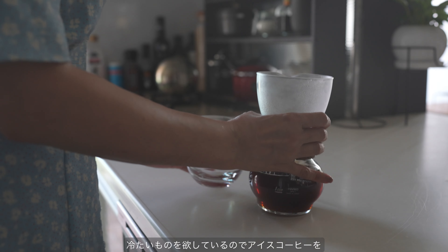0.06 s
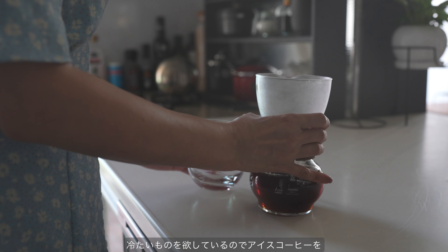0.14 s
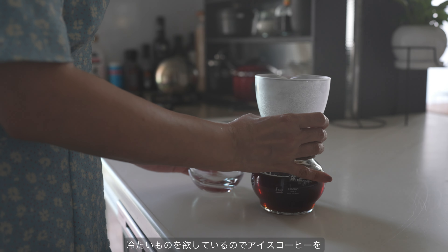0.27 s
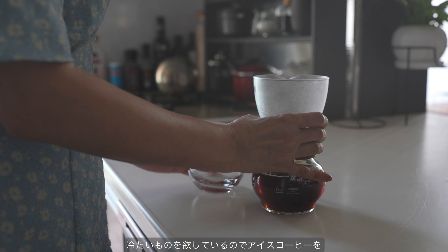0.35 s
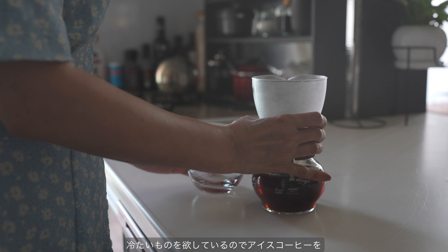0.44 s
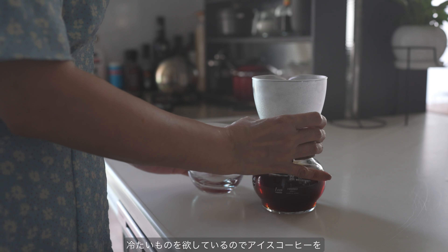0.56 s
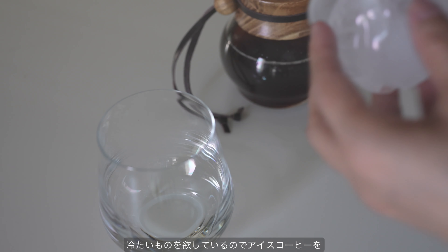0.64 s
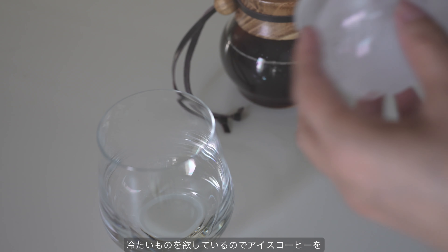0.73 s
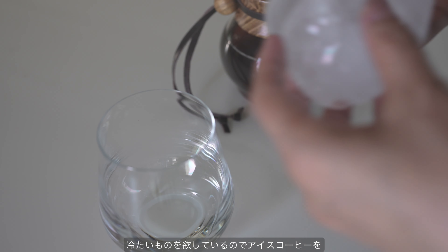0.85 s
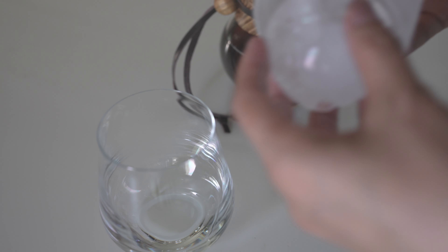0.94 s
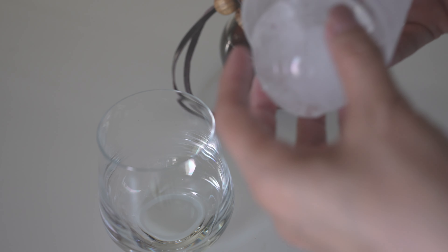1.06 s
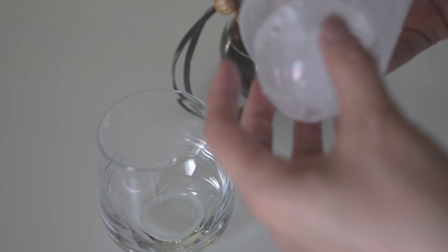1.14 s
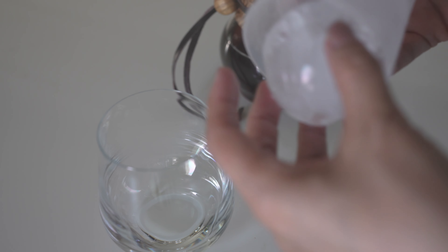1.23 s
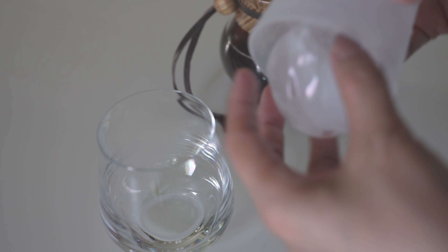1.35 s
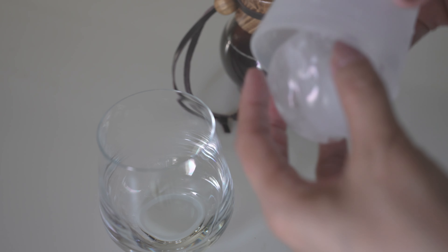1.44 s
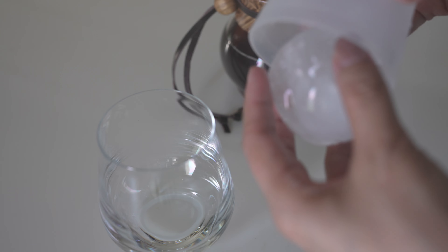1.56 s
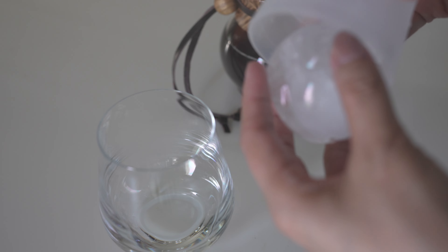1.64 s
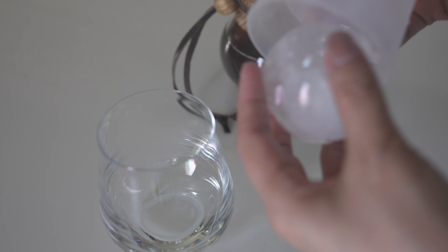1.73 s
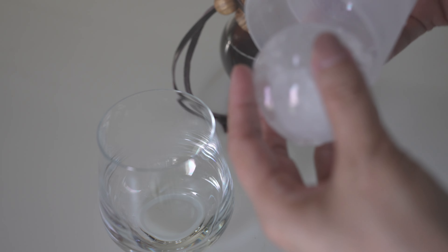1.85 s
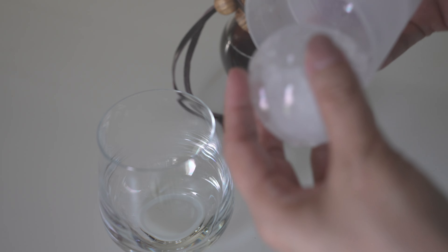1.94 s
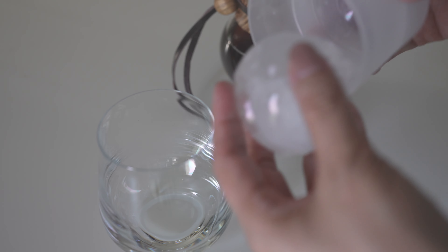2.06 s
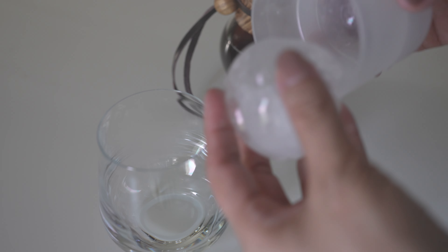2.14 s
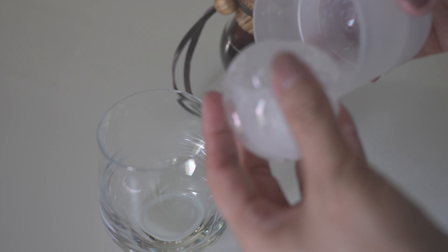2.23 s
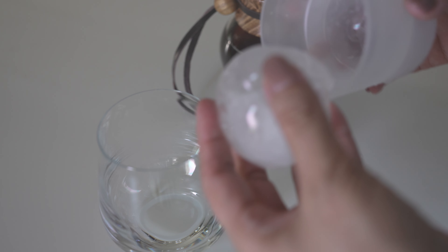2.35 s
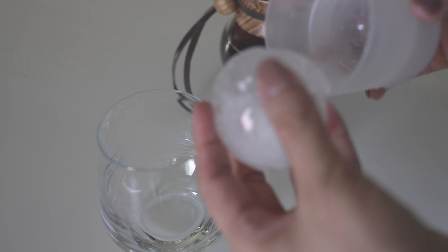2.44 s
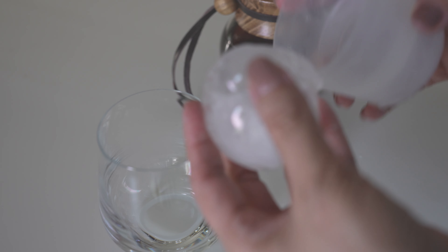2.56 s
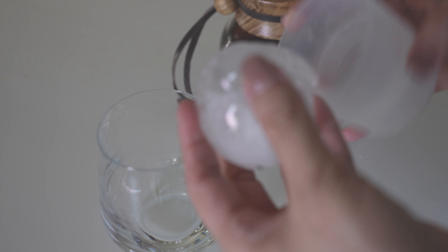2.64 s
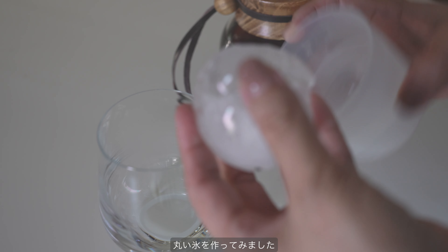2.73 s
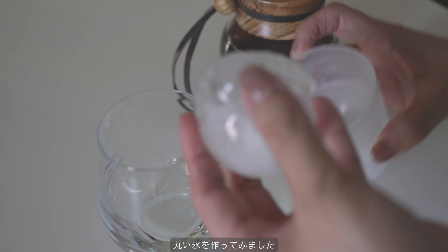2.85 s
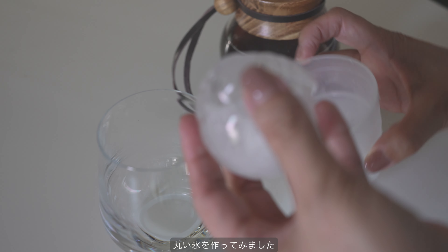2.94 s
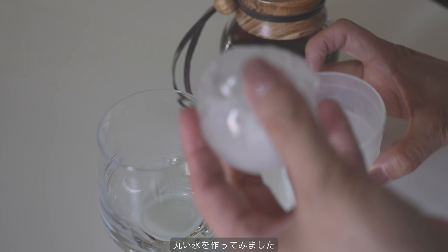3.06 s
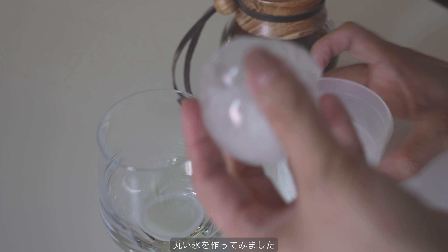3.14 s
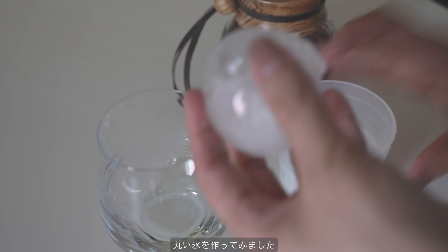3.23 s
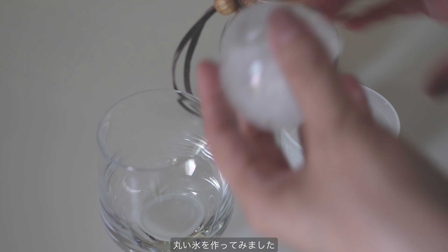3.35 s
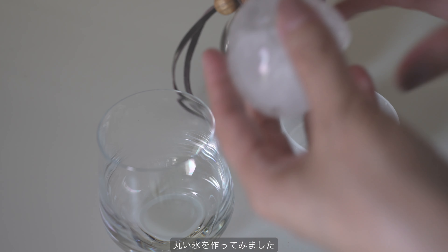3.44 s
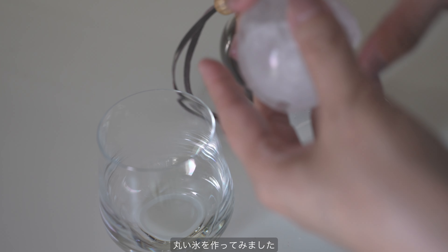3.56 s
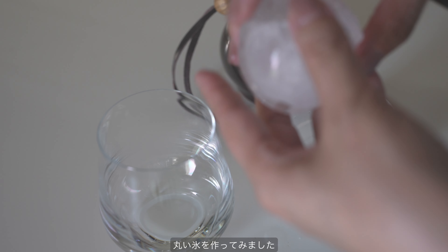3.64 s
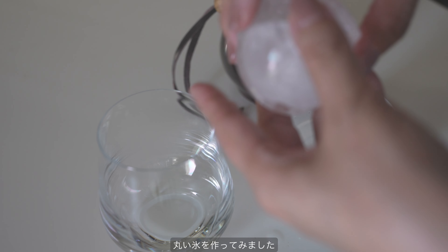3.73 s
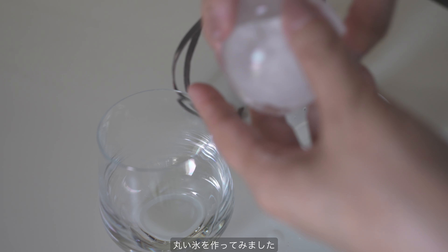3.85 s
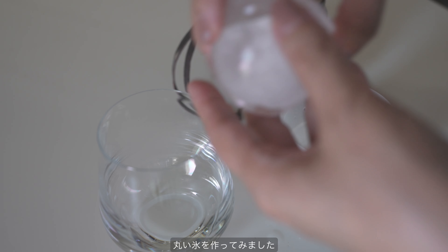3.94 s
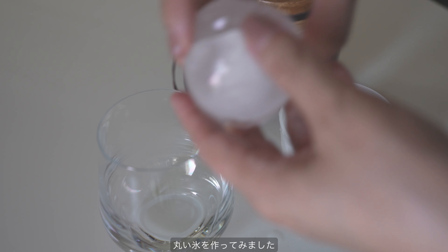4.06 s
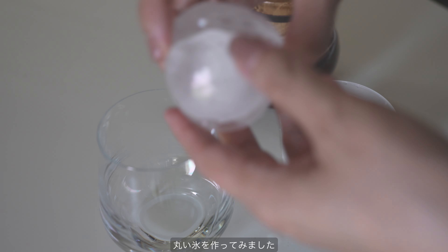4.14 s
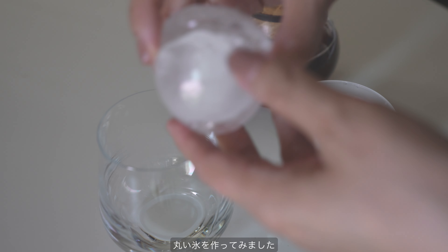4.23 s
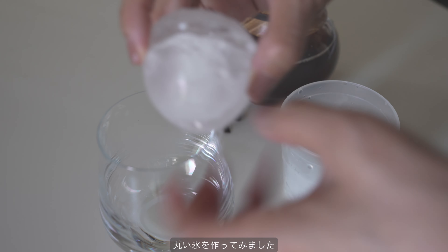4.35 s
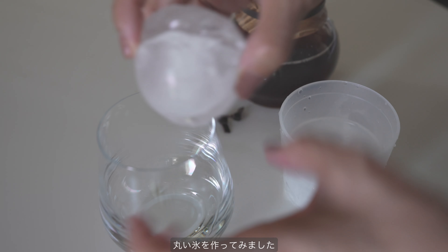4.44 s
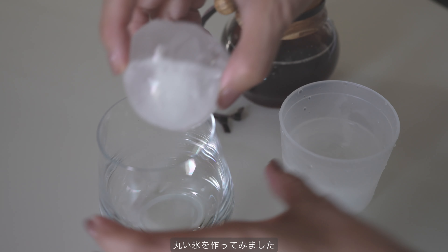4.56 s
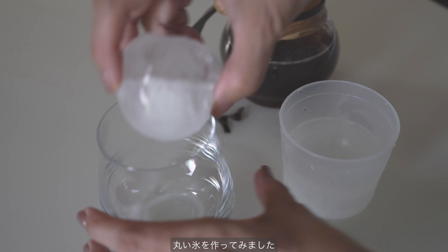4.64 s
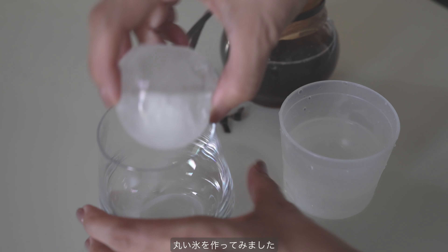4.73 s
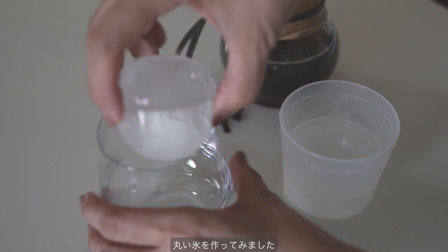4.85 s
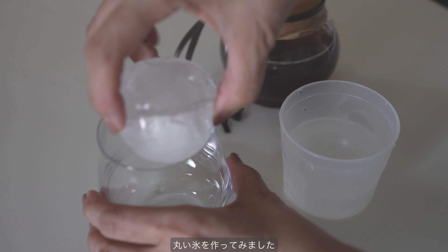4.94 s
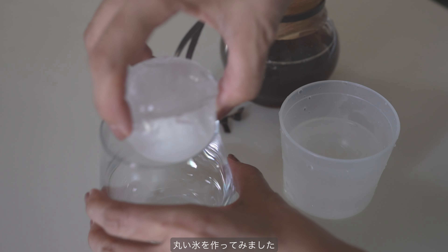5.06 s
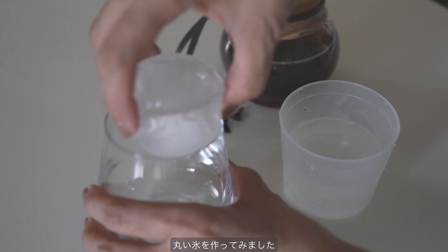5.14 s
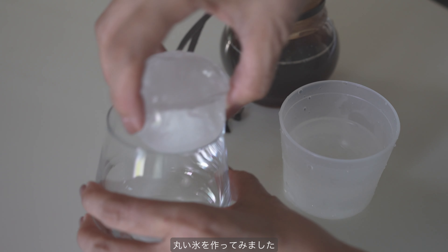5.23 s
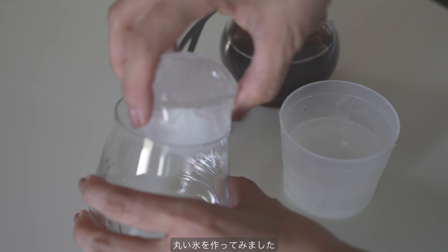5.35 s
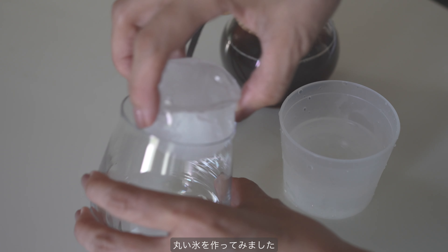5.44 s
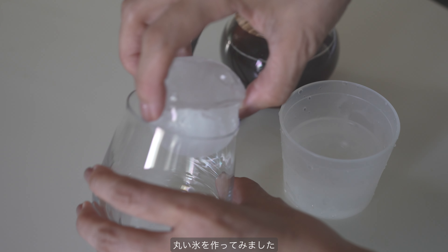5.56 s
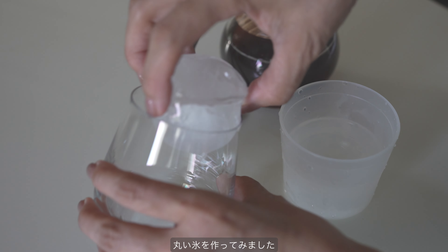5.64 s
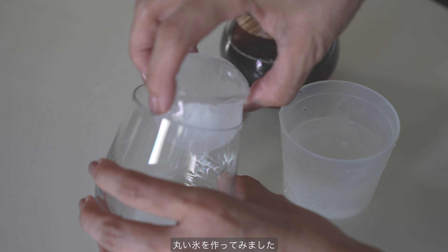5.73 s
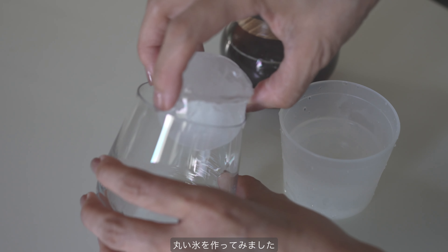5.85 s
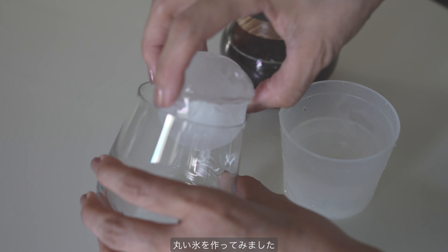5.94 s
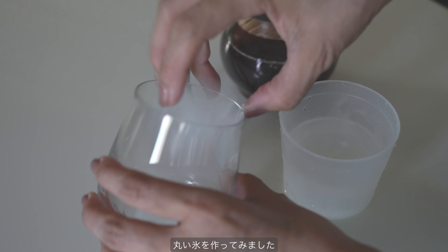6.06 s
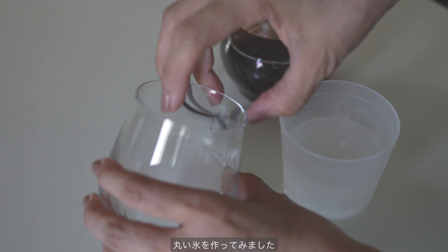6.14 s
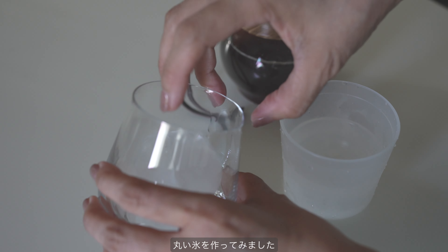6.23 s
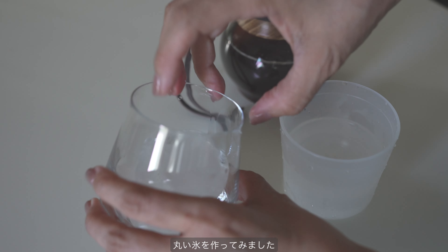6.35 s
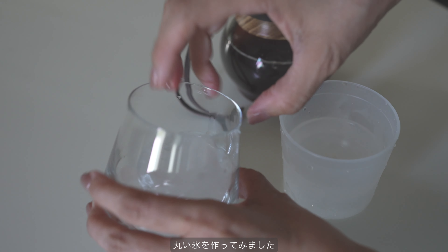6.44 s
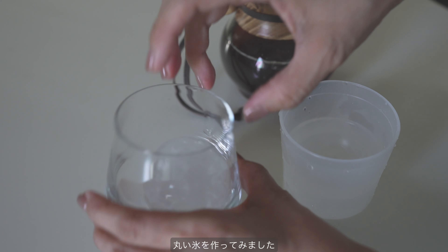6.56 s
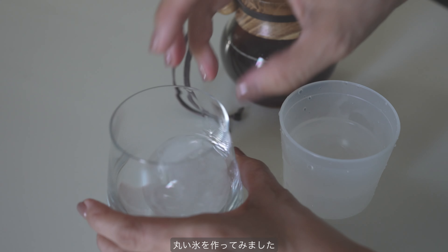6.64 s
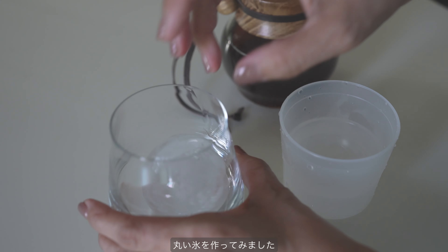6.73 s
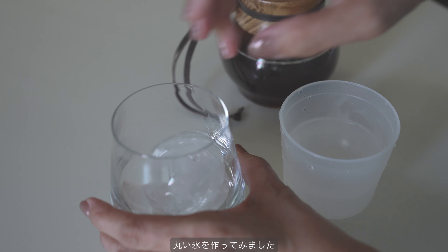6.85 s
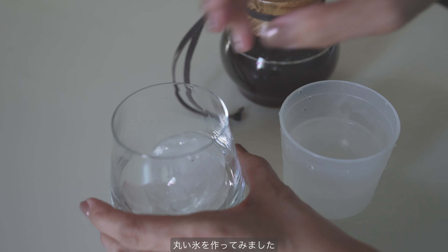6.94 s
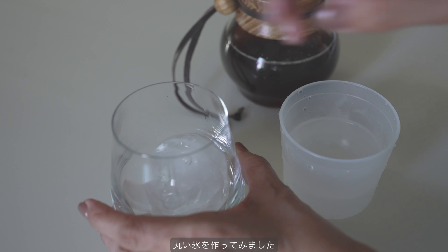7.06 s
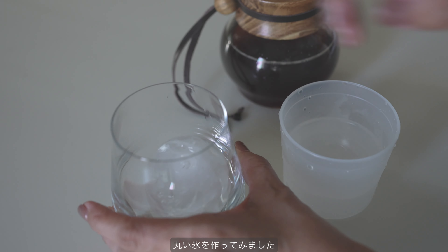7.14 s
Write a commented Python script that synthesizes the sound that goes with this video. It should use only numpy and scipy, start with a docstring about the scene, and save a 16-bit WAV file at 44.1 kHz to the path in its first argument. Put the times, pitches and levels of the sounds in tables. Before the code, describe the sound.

A coffee dripper knocks on a counter, an empty plastic mold rattles down, then an ice ball clinks and slides into a singing glass tumbler.

```python
"""A kitchen counter, where a coffee dripper knocks, a wet ball of ice slides out of its plastic mold and the
dropped mold rattles to rest. The ball taps a hand-held tumbler, rolls down its wall and makes it sing; the
tilted tumbler then knocks back onto its foot. Blows are coloured noise bursts with dying modes, rolling and
slipping are filtered random grains, sung notes are wavering sines; soft room tone lies beneath it all."""
import sys
import numpy as np
from scipy import signal
from scipy.fft import rfft, irfft
from scipy.io import wavfile
from scipy.ndimage import uniform_filter1d

SR = 44100
rng = np.random.default_rng(int(sys.argv[2]) if len(sys.argv) > 2 else 0)


def materialize(psi):
    """Save the field psi as 16-bit PCM at rate SR to the path in sys.argv[1].

    A 1-D psi becomes a single channel; in a 2-D psi each row is a channel.
    """
    bounded = np.clip(np.atleast_2d(psi).T, -1, 1)
    quanta = np.round(bounded * 32767).astype(np.int16)
    wavfile.write(sys.argv[1], SR, quanta)


N = 317079  # length in samples

# Levels in the tables are relative: trims, damping and room come on top.
# Ice against the tumbler's wall. Each row: start in seconds, knock in dB, ring in dB,
# hardness in dB per octave, bass weight in dB.
WALL_BLOWS = [(4.744, -38, -47.5, 0, 8.5), (4.898, -32, -31.5, -0.5, 0.5), (4.925, -43, -51, 1, 12),
              (5.248, -46.5, -48.5, 2.5, 0), (5.428, -34, -48.5, 0, 5.5), (6.0181, -36.5, -47.5, 5, 10),
              (6.0462, -25.5, -41.5, 3, -2), (6.075, -33.5, -41, -2, -4), (6.107, -35, -36, 2, -5.5),
              (6.116, -25, -40.5, 3.5, -5.5), (6.127, -25, -50.5, 0.5, -21), (6.2164, -49, -29.5, 2.5, 1),
              (6.392, -47, -46, -6, 1), (6.418, -39.5, -40.5, 1, 0)]
# Colour of the wall's knock. Each row: frequency in Hz, density in dB per Hz.
WALL_KNOCK = [(80, -7), (250, -2), (400, 4), (620, 5), (850, -9), (1350, -11.5), (1600, -14.5), (1820, -20),
              (2100, -15), (2900, -17), (4600, -29.5), (6600, -35.5), (8500, -22.5), (11500, -35),
              (16000, -23.5)]
# Modes of the free wall. Each row: frequency in Hz, level in dB, t60 in seconds.
WALL_MODES = [(1634, 3, 0.18), (2320, -6, .4), (2695, -5, 0.064), (3526, -11, 0.28), (5286, -10.5, 0.97),
              (5800, -36, 0.146), (7390, -6.5, 0.75), (7910, -7, 1), (8740, -2.5, 0.84),
              (8820, -12.5, 0.078), (9530, -16, 0.26), (10250, -10, 0.32), (11000, -8.5, 0.054),
              (11500, -33, 0.21), (12000, -21.5, 0.081), (13100, -7.5, 0.14), (13300, -27, 0.17),
              (13980, -22, .2), (14500, -14, .15), (15100, -40, .15), (15650, -18.5, .2)]
# how firmly the fingers press the ball on the glass (0-1), before and after they let it go
PRESS_HELD, PRESS_FREE, LET_GO_AT_S, LET_GO_LENGTH_S = .86, 0.072, 6.0, 0.033
RIM_DB = 3  # held against the rim, the ball feeds the lowest mode most
# the falling ball skips down the wall; each skip: knock dB, ring dB, hardness dB per octave, bass dB
SKIP_AT_S, SKIP_GAP_S, SKIP = 6.153, 0.026, (-35, -54, -2, -6)


def wall_taps():
    """Ice strikes the tumbler; while it stays pressed on, the glass rings higher and shorter."""
    out = np.zeros((2, N))
    skips = [(SKIP_AT_S + k * SKIP_GAP_S, *SKIP) for k in range(3)]
    for s, knock_db, ring_db, hardness, bass_db in WALL_BLOWS + skips:
        since_let_go = s - LET_GO_AT_S
        pressed = np.interp(since_let_go, [0, LET_GO_LENGTH_S], [PRESS_HELD, PRESS_FREE])
        lowest_hz = WALL_MODES[0][0]
        modes = [(hz, db + RIM_DB * pressed * (hz == lowest_hz), t60) for hz, db, t60 in WALL_MODES]
        glass = ring(modes, scatter_db=2.5, damping=350 + 1200 * pressed, stiffen_hz=195 * pressed)
        hit = amp(knock_db) * knock(WALL_KNOCK, hardness, bass_db, shudder=0.96, t60=0.078)
        add(out, s, kitchen(hit + amp(ring_db - 4.5) * glass, wet_db=-2.5))
    return out


# The ball scraping the wall. Each row: start in seconds, length in seconds, level in dB.
BALL_GRINDS = [(6.11, .18, -38.5)]
SCRAPE_WIDTH_HZ = 23  # the scraping ball damps the modes and widens them


def grinding(slips):
    """Tiny slips of the scraping ball shake the widened modes of the wall, with a little wet hiss."""
    glass = 0.
    for hz, db, t60 in WALL_MODES:
        level = amp(db + 0.98 * np.log2(hz / 8000))
        glass = glass + level * resonate(slips, hz, 6 / t60 + SCRAPE_WIDTH_HZ)
    hiss = evened(colour(slips, SLIDE_HISS))
    return (evened(glass) + 0.09 * hiss) * strokes(BALL_GRINDS, rise=0.079, t60=0.17)


# Notes rubbed out of the glass. Each row: start in seconds, length in seconds, level in dB,
# rise in seconds, t60 in seconds.
NOTES = [(6.095, 0.11, -40, 0.065, 0.93), (6.204, 0.097, -32, .055, 0.087), (6.6, .23, -57.5, .15, 0.96)]
# Modes that the rubbing draws. Each row: frequency in Hz, level in dB, lag of the swell in seconds.
SUNG_MODES = [(1625, -0.5, 0.0014), (2300, -13.5, 0.0087), (3525, -17.5, 0.031), (5250, -25.5, 0.032)]


def singing():
    """Stick-slip draws the low modes as wavering notes; the higher ones swell late and ring on."""
    t = np.arange(N) / SR
    drive = sum(stroke(*row) for row in NOTES)
    note = 0.
    for hz, db, lag in SUNG_MODES:
        # halved, because the resonance at 0 Hz has gain 2
        swell = resonate(drive, 0, 1 / (2 * np.pi * lag)) / 2 * amp(1.2 * waver(25))
        # the higher modes reach the ears further out of step
        apart = min(hz / 3600, .8) * np.array([[1], [-1]])
        note = note + amp(db) * swell * np.sin(2 * np.pi * hz * t + 0.41 * waver(31) + apart)
    return np.sqrt(2) * note


# Squeaks of the rubbed glass. Each row: start in seconds, length in seconds, level in dB.
SQUEAKS = [(6.248, 0.019, -34.5), (6.276, 0.0069, -38.5)]
SQUEAK_HZ = 8005


def squeaking():
    """Stick-slip at one high pitch: brief sines with a fast, random waver of phase."""
    t = np.arange(N) / SR
    tone = np.sin(2 * np.pi * SQUEAK_HZ * t + 1.5 * waver(160))
    return strokes(SQUEAKS, rise=0.0026, t60=.04) * tone


def rubbing():
    """The ball slips down the wall: it grinds, sings and squeaks, each with its own share of room."""
    slips = widened(grains(per_s=2800, spread_db=7.0), 0.62 * grains(per_s=1300, spread_db=10.5))
    wet_grind = kitchen(grinding(slips), wet_db=-8.0)
    return wet_grind + kitchen(singing(), wet_db=-13) + kitchen(squeaking(), wet_db=-7.5)


# Stereo lean of the wall's sound. Each row: frequency in Hz, left minus right in dB.
GLASS_BALANCE = [(400, 1), (1600, 4), (2400, -1), (4400, 1.5), (8500, -5.5), (12000, 1.5)]


def tumbler_wall():
    """Taps and rubbing together; each mode of the wall radiates more to one side."""
    lean_db = read(GLASS_BALANCE, np.fft.rfftfreq(N, 1 / SR)) * np.array([[.5], [-.5]])
    return irfft(rfft(wall_taps() + rubbing()) * amp(lean_db), N)


# The foot knocking on the counter. Each row: start in seconds, knock in dB, ring in dB,
# hardness in dB per octave, bass weight in dB.
FOOT_BLOWS = [(6.5465, -23.5, -45, 2, 7), (6.556, -30.5, -49.5, -7, 8), (6.636, -54, -50, 5, -11),
              (6.6625, -26.5, -47, 2.5, -46), (6.731, -35.5, -51.5, 1, -31), (6.765, -53, -76, 14, 0),
              (6.892, -31, -75.5, 1, 14)]
# Colour of the foot's knock. Each row: frequency in Hz, density in dB per Hz.
FOOT_KNOCK = [(59, -48), (100, -22.5), (299, -12), (481, 0.5), (841, -7), (1010, 0), (1200, -3.5),
              (1880, -9), (2850, -10.5), (3810, -19.5), (4580, -32), (10300, -53.5), (13200, -41),
              (14000, -52)]
# Modes of the foot. Each row: frequency in Hz, level in dB, t60 in seconds.
FOOT_MODES = [(968, 6.5, 0.3), (994, 8.5, 0.42), (1040, -3, 0.22), (1420, 12.5, .1), (2100, -11, .15),
              (2760, 11.5, 0.08), (3630, -14, .08), (8000, -19, .15), (9100, -22, 0.23), (10975, -22, 0.3),
              (12040, -4, 0.15), (12960, 3, 0.093), (15710, -20, 0.38)]


def tumbler_foot():
    """The tilted tumbler knocks back onto its foot: glass modes and a thud of the worktop."""
    return blows(FOOT_BLOWS, FOOT_KNOCK, FOOT_MODES, knock_db=0.0, ring_db=-5, thud_db=-31.5,
                 shudder=0.78, t60=0.051, wet_db=-2.5)


# The foot rolling on the counter as the tumbler tilts, the ball rolling down the wall, and the ball
# circling in the bottom. Each row: start in seconds, length in seconds, level in dB.
FOOT_ROLLS = [(5.156, .016, -43), (5.232, 0.049, -47.5)]
BALL_ROLLS = [(6.115, 0.059, -31.5)]
BALL_CIRCLES = [(6.545, 0.043, -38), (6.65, 0.11, -48)]
# Their colours, in the same order. Each row: frequency in Hz, density in dB per Hz.
TILT_COLOUR = [(120, -20), (270, -22), (390, -2.5), (560, -12.5), (730, -1), (900, -14.5), (1100, -20),
               (1330, -19), (2300, -41), (4000, -48), (6000, -69)]
ROLL_COLOUR = [(47, -48.5), (80, -8.5), (333, -7.5), (496, -2), (765, -9), (1020, -3.5), (1290, -10),
               (1660, -8), (1920, -13.5), (2810, -15), (4920, -42), (6000, -50), (7800, -70), (13200, -120)]
CIRCLE_COLOUR = [(200, -26), (600, -8.5), (880, -7.5), (960, 2), (1060, 8), (1200, -3.5), (1460, -6),
                 (2200, -13), (2830, -14), (3200, -35), (3800, -25), (4600, -45), (12000, -52)]


def tumbler_rolls():
    """Rolling bumps of the foot on the counter and of the ball inside the glass."""
    tilt = rolling(strokes(FOOT_ROLLS, rise=0.0043, t60=0.28), TILT_COLOUR, wet_db=-2.0)
    down = rolling(strokes(BALL_ROLLS, rise=0.045, t60=0.49), ROLL_COLOUR, wet_db=-7.5)
    around = rolling(strokes(BALL_CIRCLES, rise=0.028, t60=0.28), CIRCLE_COLOUR, wet_db=-18)
    return tilt + down + around


# The mold's bounces. Each row: start in seconds, knock in dB, ring in dB, hardness in dB per octave,
# bass weight in dB.
MOLD_BLOWS = [(3.049, -26, -25.5, 3.5, 4), (3.186, -26.5, -21, 1, -11.5), (3.230, -21.5, -27.5, 3, -1),
              (3.264, -28, -26, 0.5, -7), (3.294, -21.5, -28.5, 0.5, -8), (3.321, -25.5, -52, 2, 3.5),
              (3.346, -34, -42, 0, -2), (3.366, -26.5, -50, 3, -0.5)]
# Colour of the mold's knock. Each row: frequency in Hz, density in dB per Hz.
MOLD_KNOCK = [(88, -27), (150, -17.5), (361, -9), (398, -6.5), (578, -6), (960, -2), (1170, -8.5),
              (1450, 1.5), (1630, -5.5), (3420, -24.5), (4580, -31.5), (5910, -28), (6640, -33.5),
              (13200, -48.5), (16000, -49)]
# Modes of the mold before it tips. Each row: frequency in Hz, level in dB, t60 in seconds.
MOLD_MODES = [(740, -13, 0.029), (950, -35, 0.03), (1252, 1, 0.032), (1422, 2, 0.038), (1540, -15, 0.028),
              (2100, -15.5, 0.044), (6050, -18, 0.02)]
# The rim chattering as the bounces merge. Each row: start in seconds, length in seconds, level in dB.
MOLD_SCUFFS = [(3.305, 0.059, -35)]
# after each bounce the far side of the rim lands too, softer and duller (hardness in dB per octave)
REBOUND_S, REBOUND_DB, REBOUND_HARDNESS = 0.0077, -10, -4.5
# the mold's note drops as it tips from its rim onto its side; the low modes drop most
TIP_AT_S, TIP_LENGTH_S, TIP_DROP_HZ = 3.24, 0.0264, 385


def tipping(s):
    """Pitch shift in Hz of a bounce at s seconds, as the mold tips over."""
    return -TIP_DROP_HZ * np.clip((s - TIP_AT_S) / TIP_LENGTH_S, 0, 1)


def dropped_mold():
    """The empty mold bounces on both sides of its rim, tips over and chatters to rest."""
    rebounds = [(s + REBOUND_S, knock_db + REBOUND_DB, ring_db + REBOUND_DB, hardness + REBOUND_HARDNESS, bass_db)
                for s, knock_db, ring_db, hardness, bass_db in MOLD_BLOWS]
    bounces = blows(MOLD_BLOWS + rebounds, MOLD_KNOCK, MOLD_MODES, knock_db=-4.0, ring_db=-2.5, thud_db=-30,
                    shudder=0.86, t60=0.045, wet_db=1.0, shift_hz=tipping)
    return bounces + rolling(strokes(MOLD_SCUFFS, rise=0.056, t60=0.1), MOLD_KNOCK, wet_db=-6.0)


# Ice slipping in the mold. Each row: start in seconds, length in seconds, wet hiss in dB,
# hollow of the mold in dB.
SLIPS = [(1.032, 0.026, -71, -63.5), (1.087, 0.03, -72.5, -68), (1.16, 0.083, -73.5, -85),
         (1.35, 0.054, -72, -74), (1.443, 0.034, -61, -58), (1.49, .035, -70.5, -72), (1.60, .03, -77, -85),
         (1.73, 0.082, -76, -88), (2.325, 0.035, -73, -75), (2.361, .028, -59.5, -65)]
# Colour of wet ice slipping, also heard in the grinding. Each row: frequency in Hz, density in dB per Hz.
SLIDE_HISS = [(1760, -45), (3000, -12), (5000, -10), (7400, 1.5), (8580, -6), (14000, -8.5), (16000, -4)]


def unmolding():
    """Wet ice slips along the plastic: a fine crackle, and the hollow of the mold answering."""
    hiss = evened(colour(grains(per_s=1000, spread_db=0), SLIDE_HISS))
    hiss *= strokes([(s, length, db) for s, length, db, _ in SLIPS], rise=0.021, t60=0.1)
    hollow = evened(resonate(resonate(rng.standard_normal(N), 1100, 220), 1030, 240))
    hollow *= strokes([(s, length, db) for s, length, _, db in SLIPS], rise=0.031, t60=.06)
    return kitchen(hiss + hollow, wet_db=-1.5)


# The dripper's blows. Each row: start in seconds, knock in dB, ring in dB, hardness in dB per octave,
# bass weight in dB.
DRIPPER_BLOWS = [(.111, -25, -48.5, 3.5, 7), (.416, -31.5, -82, -3.5, -15), (.460, -32.5, -72, -0.5, 3)]
# Colour of the dripper's knock. Each row: frequency in Hz, density in dB per Hz.
DRIPPER_KNOCK = [(35, -24), (60, -16), (101, 5), (161, -11), (295, -4.5), (372, -0.5), (542, -5.5),
                 (878, -7.5), (1450, -14), (3580, -25.5), (5110, -45), (6440, -40.5), (9000, -65),
                 (11700, -74), (19800, -120)]
# Modes of the dripper. Each row: frequency in Hz, level in dB, t60 in seconds.
DRIPPER_MODES = [(2900, 5, .025), (3700, 5, 0.05), (6360, 0, 0.16), (6590, -0.5, 0.19), (7500, -7, 0.23),
                 (7780, 1.5, 0.23), (8230, -3, 0.23), (9200, -6, 0.29), (10760, -13, 0.23),
                 (11670, -7.5, 0.23)]


def coffee_dripper():
    """The dripper knocks on the counter: rough contact, bright short modes and a thud below."""
    return blows(DRIPPER_BLOWS, DRIPPER_KNOCK, DRIPPER_MODES, knock_db=1.0, ring_db=-9.0, thud_db=-25,
                 shudder=1.41, t60=0.088, wet_db=2.0)


# Small snaps of ice and wet plastic. Each row: start in seconds, level in dB, centre in Hz.
SNAPS = [(0.6973, -52, 3400), (0.7306, -53, 3340), (0.7633, -52, 6800), (1.5338, -54.5, 6900),
         (2.5586, -56, 6050), (3.5982, -42, 8040), (4.308, -57.5, 2920), (5.034, -55, 2960),
         (5.0797, -53, 8460)]


def snaps():
    """Single bright ticks of cracking ice and wet plastic: clicks through two broad resonances."""
    out, click = np.zeros((2, N)), signal.unit_impulse(SR // 2)
    for s, db, hz in SNAPS:
        tick = resonate(resonate(click, hz, 2800), hz, 2800)
        add(out, s, kitchen(amp(db + 3) * tick / abs(tick).max(), wet_db=-1.5))
    return out


# Colour of the room tone. Each row: frequency in Hz, density in dB per Hz.
HUSH = [(12, -36), (20, 3), (35, -5.5), (74, -12.5), (134, -14), (168, -8.5), (241, -15.5), (293, -16),
        (337, -21), (485, -20.5), (738, -28.5), (1150, -29.5), (3340, -44), (14700, -51), (16000, -54.5)]
# Likeness of the two ears. Each row: frequency in Hz, correlation of left and right from -1 to 1.
LIKENESS = [(60, 0.99), (130, 0.99), (290, 0.96), (640, 0.62), (1410, 0.31), (3100, -0.13), (6820, -0.32),
            (15000, 0.32)]
HUSH_DB = -54  # level before the sink
HUSH_SINK_AT_S, HUSH_SINK_LENGTH_S, HUSH_SINK_DB = 6, 0.78, 6.5


def hush():
    """Low room tone, alike at both ears in the bass, sinking away at the end."""
    hz, t = np.fft.rfftfreq(N, 1 / SR), np.arange(N) / SR
    left, other = rfft(rng.standard_normal((2, N)))
    same = np.clip(read(LIKENESS, hz), -1, 1)
    right = same * left + np.sqrt(1 - same ** 2) * other
    air = irfft(np.array([left, right]) * amp(read(HUSH, hz)), N)
    sunk = np.clip((t - HUSH_SINK_AT_S) / HUSH_SINK_LENGTH_S, 0, 1)
    return evened(air) * amp(HUSH_DB - HUSH_SINK_DB * sunk)


# The worktop's thud. Each row: frequency in Hz, level in dB, t60 in seconds.
COUNTER_MODES = [(77, -5, 0.18), (96.5, -2.5, 0.54)]


def blows(rows, points, modes, knock_db, ring_db, thud_db, shudder, t60, wet_db, shift_hz=lambda s: 0):
    """Each blow is a knock and the ring of the object, heard in the kitchen, and a dry worktop thud."""
    out = np.zeros((2, N))
    for s, row_knock_db, row_ring_db, hardness, bass_db in rows:
        hit = amp(row_knock_db + knock_db) * knock(points, hardness, bass_db, shudder, t60)
        hit += amp(row_ring_db + ring_db) * ring(modes, scatter_db=2.5, split=0.01, stiffen_hz=shift_hz(s))
        thud = amp(row_knock_db + bass_db / 2 + thud_db) * ring(COUNTER_MODES, scatter_db=1.5)
        add(out, s, kitchen(hit, wet_db) + thud)
    return out


def knock(points, hardness, bass_db, shudder, t60, size=26000):
    """A brief rough contact, then the duller shudder of the struck body; its loudest 2 ms have level 1."""
    t = np.arange(size) / SR
    contact, body = np.exp(-t / 0.0012), amp(-60 * t / t60)
    crack, shake = rng.choice([-1, 1], (2, 2, size))
    shake = signal.sosfilt(signal.butter(1, 1800, fs=SR, output="sos"), shake)
    crack = crack * contact / np.linalg.norm(contact)
    shake = shake * body / np.linalg.norm(body)
    force = rfft(crack + 1.43 * shudder * shake)
    # the blow feeds all frequencies evenly; the colour comes from the body alone
    force /= np.sqrt(uniform_filter1d(abs(force) ** 2, size=160))
    mid, side = irfft(force, size) * (np.arange(size) < size / 2)
    push = colour(widened(mid, 0.42 * side), points, hardness, bass_db)
    return push / np.sqrt(uniform_filter1d((push ** 2).mean(0), size=88).max())


def ring(modes, scatter_db, damping=0, stiffen_hz=0, split=0.002, size=26000):
    """Dying modes in close pairs; a pressed contact damps them (dB per s) and raises the low ones most."""
    t, out = np.arange(size) / SR, np.zeros((2, size))
    for hz, db, t60 in modes:
        pitch = hz + stiffen_hz / (1 + (hz / 7000) ** 4)
        # short waves reach the two ears out of step
        apart = rng.choice([-1, 1]) * min(hz / 3500, .65) * np.array([[1], [-1]])
        phase = rng.uniform(0, 2 * np.pi) + apart
        twin = pitch * (1 + split * rng.normal())
        pair = 0.98 * np.sin(2 * np.pi * pitch * t + phase) + 0.12 * np.cos(2 * np.pi * twin * t + phase)
        out += amp(db + scatter_db * rng.normal() - (60 / t60 + damping) * t) * pair
    return out * (1 - np.exp(-t / 0.00041))  # soft onset


def rolling(gain, points, wet_db):
    """Small bumps of a rolling or chattering contact, as random grains in the given colour."""
    bumps = widened(grains(per_s=1800, spread_db=1.0), .5 * grains(per_s=780, spread_db=-3.5))
    return kitchen(evened(colour(bumps, points)) * gain, wet_db)


def grains(per_s, spread_db):
    """Random tiny slips of uneven size."""
    hits = rng.choice([-1, 1], N) * (rng.random(N) < per_s / SR)
    return hits * amp(spread_db * np.minimum(rng.exponential(1, N), 3))


def stroke(s, length, db, rise, t60):
    """Gain of one contact: it swells smoothly, holds to the end of its length, then dies away."""
    t = np.arange(N) / SR - s
    swell = np.sin(np.pi / 2 * np.clip(t / rise, 0, 1)) ** 2
    return swell * amp(db - 60 * np.maximum(t - length, 0) / t60)


def strokes(rows, rise, t60):
    """Gain of several contacts that share one attack and one release."""
    return np.sqrt(sum(stroke(*row, rise, t60) ** 2 for row in rows))


def waver(width_hz):
    """Slow random motion of size 1."""
    return evened(resonate(resonate(rng.standard_normal(N), 0, width_hz), 0, width_hz))


def resonate(x, hz, width):
    """One resonance of about gain 1, width in Hz; at 0 Hz it is a lowpass of gain 2."""
    r = np.exp(-np.pi * width / SR)
    return 2 * signal.lfilter([1 - r], [1, -r * np.exp(2j * np.pi * hz / SR)], x).real


def colour(x, points, hardness=0, bass_db=0, size=2048):
    """Causal filter with the given spectrum; harder contact tilts it up, weight lifts the bass."""
    hz = abs(np.fft.fftfreq(size, 1 / SR))
    tilt_db = hardness * np.log2(np.clip(hz, 500, 8000) / 1000)
    db = read(points, hz) + tilt_db + bass_db / (1 + (hz / 500) ** 4)
    log_gain = np.log(amp(np.maximum(db, -100)))
    # minimum phase, so that nothing sounds before the blow
    taps = np.fft.ifft(np.exp(signal.hilbert(log_gain).conj())).real[:size // 2]
    return signal.oaconvolve(np.atleast_2d(x), taps[None], axes=1)[:, :x.shape[-1]]


def widened(mid, side, mono_below_hz=480):
    """Two ears that hear the bass alike and the treble apart."""
    side = signal.sosfilt(signal.butter(2, mono_below_hz, "high", fs=SR, output="sos"), side)
    return np.array([mid + side, mid - side])


# Decay of the kitchen. Each row: frequency in Hz, t60 in seconds.
ROOM = [(100, 0.55), (400, 0.43), (1500, 0.4), (5000, 0.43), (15000, 0.33)]


def kitchen(x, wet_db, size=24000):
    """Direct sound plus dense random reflections, whose decay time depends on frequency."""
    taps = widened(*(rng.standard_normal((2, size)) * (rng.random((2, size)) < .12)))
    taps *= np.clip(np.arange(size) / SR / 0.0032 - .5, 0, 1)  # a short gap before the reflections
    hz, t, z = signal.stft(taps, SR, nperseg=256)
    tail = signal.istft(z * amp(-60 * t / read(ROOM, hz)[:, None]), SR, nperseg=256)[1]
    tail /= np.linalg.norm(tail, axis=1, keepdims=True)
    return x + amp(wet_db) * signal.fftconvolve(np.atleast_2d(x), tail, axes=1)[:, :x.shape[-1]]


def amp(db):
    """Decibels to gain."""
    return 10 ** (np.asarray(db) / 20)


def evened(x):
    """Scale to an rms of 1."""
    return x / np.sqrt(np.mean(x ** 2) + 1e-20)


def read(points, hz):
    """A curve's value at hz, on a log-frequency axis."""
    f, value = np.transpose(points)
    return np.interp(np.log(hz + 1), np.log(f + 1), value)


def add(mix, s, sound):
    """Lay a sound into the mix at s seconds, cut at the end."""
    part = mix[:, round(s * SR):][:, :sound.shape[-1]]
    part += sound[..., :part.shape[1]]


def scene():
    """Dripper and mold a little to the right, foot and rolls a little to the left, over the room tone."""
    right_hand_side = coffee_dripper() + dropped_mold() + unmolding() + snaps()
    left_hand_side = tumbler_foot() + tumbler_rolls()
    placed = right_hand_side * amp([[-.8], [.8]]) + left_hand_side * amp([[.5], [-.5]])
    return placed + tumbler_wall() + hush()


def record(dry):
    """A steep lowpass ends the treble at 15950 Hz."""
    lowpass = signal.firwin(511, 15950, window=("kaiser", 9), fs=SR)
    return signal.oaconvolve(dry, lowpass[None], "same")


dry = scene()
out = record(dry)
materialize(out)
```